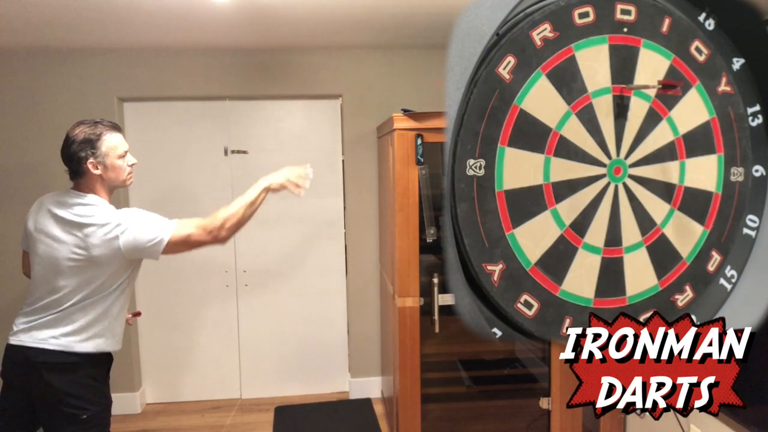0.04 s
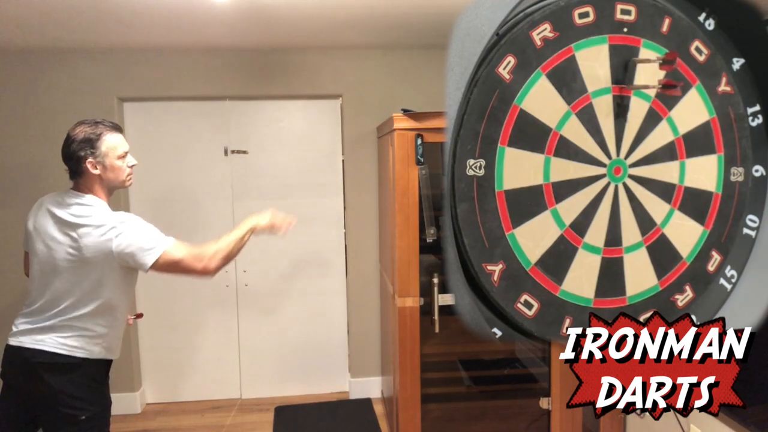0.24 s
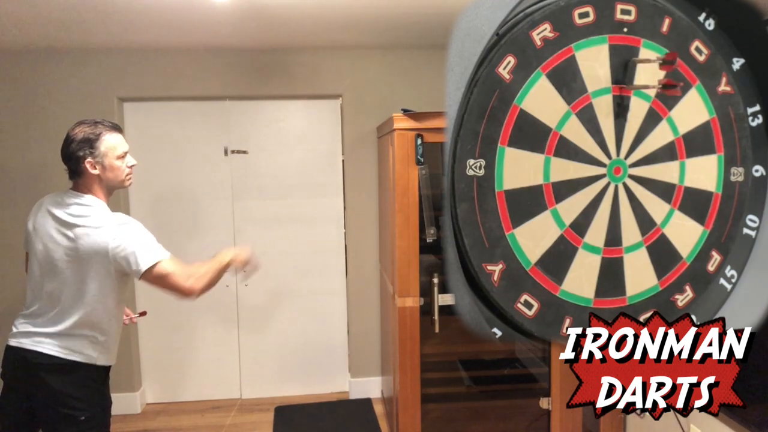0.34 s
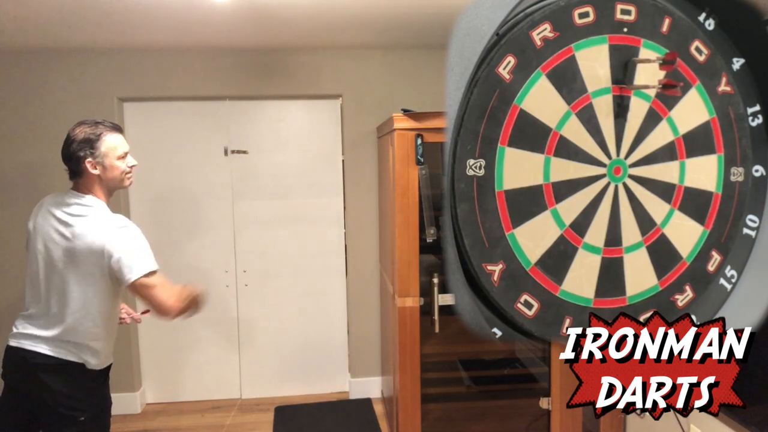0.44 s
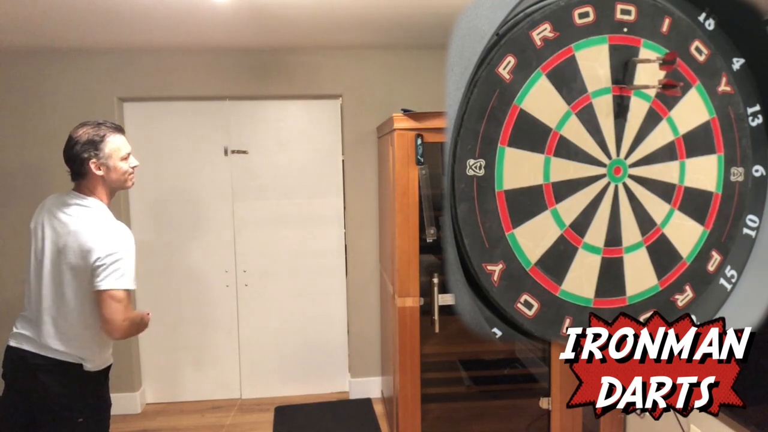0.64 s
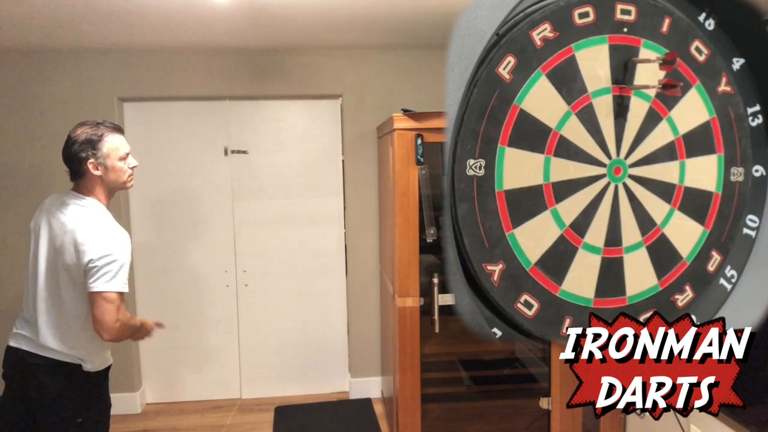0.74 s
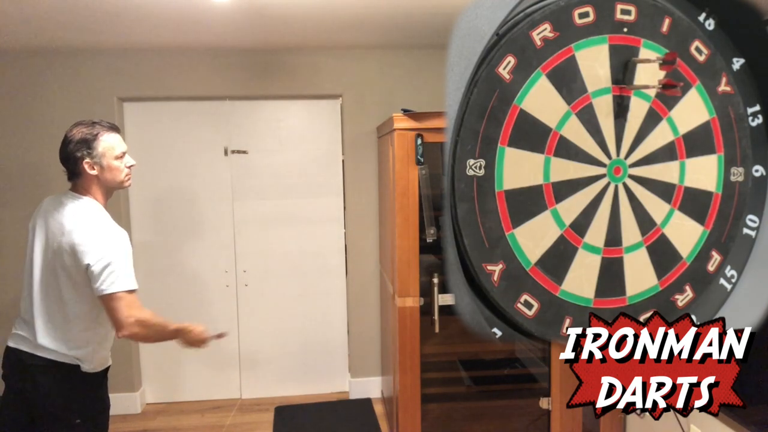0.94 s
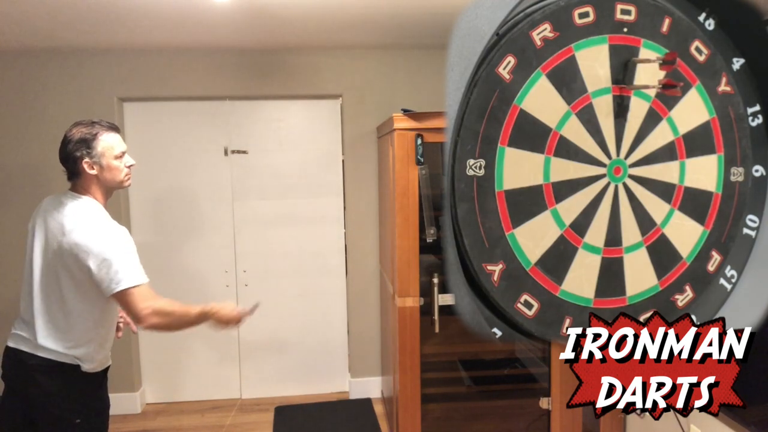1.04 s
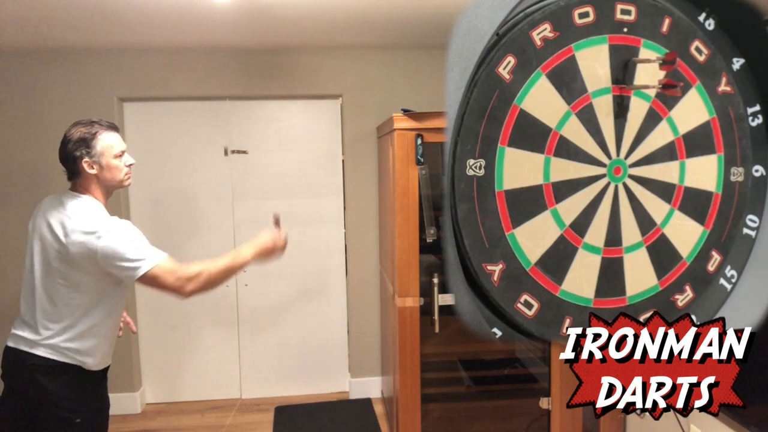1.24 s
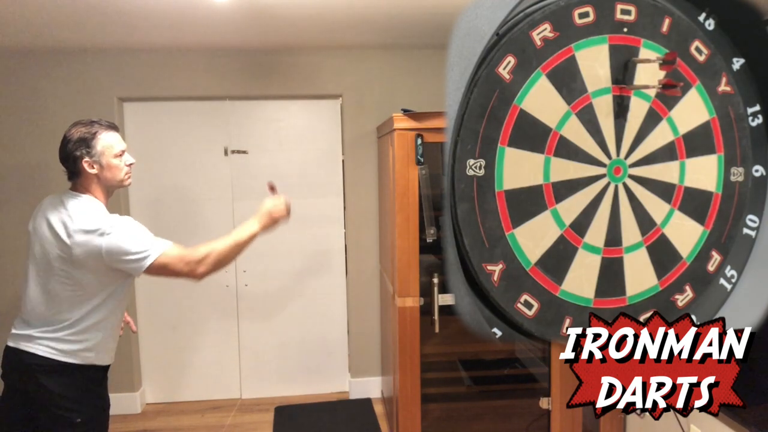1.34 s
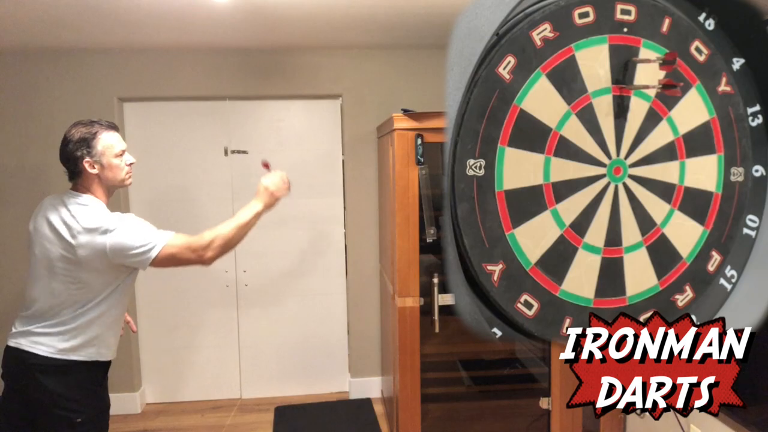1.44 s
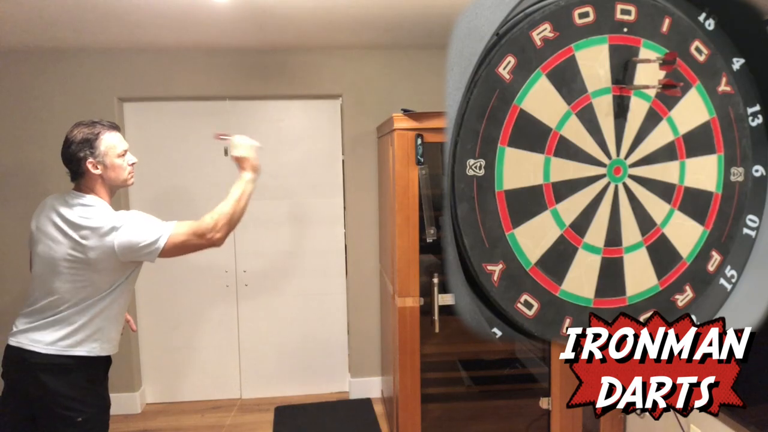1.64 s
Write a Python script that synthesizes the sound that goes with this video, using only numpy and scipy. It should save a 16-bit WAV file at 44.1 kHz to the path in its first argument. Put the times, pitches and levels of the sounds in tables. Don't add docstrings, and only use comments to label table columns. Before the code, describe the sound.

One sharp dart impact on a fibre board, boomy wall ring, then faint clinks and hum

```python
import sys
import numpy as np
from scipy import signal
from scipy.fft import rfft, irfft
from scipy.io import wavfile

SR = 44100
rng = np.random.default_rng(int(sys.argv[2]) if len(sys.argv) > 2 else 0)


def gain_from_decibels(decibels):
    exponent = np.asarray(decibels, float) / 20
    return 10 ** exponent


def int16_out(signal):
    q = np.round(np.clip(np.atleast_2d(signal).T, -1, 1) * 32767)
    wavfile.write(sys.argv[1], SR, q.astype(np.int16))


N = 74970
T = np.arange(N) / SR

HIT_S = 0.2185
LAG_CYCLES = 2.5
# frequency in Hz, t60 in s.
ROOM_DECAY = [(150, 0.8), (700, 0.74), (1500, 0.94), (3500, 0.83), (5500, 0.78), (10300, 0.48),
              (11500, 0.25)]


def rms_one(x):
    return x / np.sqrt(np.mean(x ** 2) + 1e-20)


def at_hz(points, hz):
    table_hz, value = np.transpose(points)
    return np.interp(np.log(hz), np.log(table_hz), value)


def drift(rate):
    r = np.exp(-80 * np.pi * rate / SR)
    slow = signal.lfilter([1], [1, -2 * r, r * r], rng.standard_normal(N // 40 + 2002))[2000:]
    return np.interp(np.arange(N) / 40, np.arange(len(slow)), rms_one(slow))


def blow(start, rise, t60):
    t = np.maximum(T - start, 0)
    swell = (1 - np.exp(-t / max(rise, 1e-4))) ** 2
    return swell * gain_from_decibels(-60 * t / max(t60, 0.005))


def resonant_noise(hz, width):
    r = np.exp(-np.pi * width / SR)
    section = [1, 0, -1, 1, -2 * r * np.cos(2 * np.pi * hz / SR), r * r]
    return rms_one(signal.sosfilt([section] * 2, rng.standard_normal(N + 9000))[9000:])


def coloured(spectrum, db, envelope):
    size = N + 9000
    bins_hz = np.arange(1, size // 2 + 2) * SR / size
    noise = irfft(rfft(rng.standard_normal((2, size))) * gain_from_decibels(at_hz(spectrum, bins_hz)), size)
    level = gain_from_decibels(db) / np.sqrt(np.mean(noise ** 2))
    edges = 26 * 2 ** np.arange(0, 9.4, 1 / 3)
    out = np.zeros(N)
    for k, (lo, hi) in enumerate(zip(edges, edges[1:])):
        band = signal.butter(2, [lo, hi], "band", fs=SR, output="sos")
        out += signal.sosfilt(band, noise[k % 2])[-N:] * envelope(np.sqrt(lo * hi))
    return level * out


def tip():
    # delay after the hit in s, centre in Hz, width in Hz, level in dB, t60 in s.
    crunch = [(0.00054, 8560, 2500, -44.5, 0.095), (0.0043, 3370, 410, -40.5, 0.044),
              (0.005, 4230, 350, -47, 0.044), (.0005, 15400, 2200, -51, 0.046),
              (.0002, 5500, 3700, -56, 0.038)]
    out = np.zeros(N)
    for lag, hz, width, db, t60 in crunch:
        out += gain_from_decibels(db) * resonant_noise(hz, width) * blow(HIT_S + lag, 0.0004, t60)
    return out


def snaps():
    # start in s, level in dB, centre in Hz, width in Hz.
    clicks = [(.2194, -40, 9000, 9000), (.2228, -31, 3500, 1510), (.2234, -31, 11000, 9000),
              (0.2292, -37, 3570, 2000), (0.233, -31, 8000, 6000), (0.2337, -34, 3450, 1200),
              (0.2233, -40, 2150, 300), (.5672, -62, 3500, 300), (.5755, -56, 9000, 8000),
              (.5765, -55, 4200, 4000), (.5853, -57, 8000, 6000), (.5962, -59, 5000, 5000)]
    out = np.zeros(N)
    for start, db, hz, width in clicks:
        t = np.maximum(T - start, 0)
        out += gain_from_decibels(db) * np.sin(2 * np.pi * hz * t) * np.exp(-np.pi * width * t)
    return out


def board():
    # frequency in Hz, level in dB, t60 in s.
    modes = [(226, -28, 0.33), (312, -29, 0.45), (357.7, -25, 0.13), (375, -25.5, 0.37), (473, -31, 0.18),
             (517.6, -31, 0.52), (560, -38, 0.76), (595, -22, 0.21), (603.9, -28, 0.34), (642, -39, 0.4),
             (645, -27.5, 0.2), (790, -36.5, 0.37), (911, -28, 0.11), (951, -36, 0.22)]
    out = np.zeros(N)
    for hz, db, t60 in modes:
        tone = np.sin(2 * np.pi * hz * T + rng.uniform(0, 2 * np.pi))
        start = HIT_S + 0.002 + LAG_CYCLES / hz
        out += gain_from_decibels(db) * tone * blow(start, 2 / hz, t60)
    return out


def wall():
    # delay after the hit in s, frequency in Hz, level in dB, rise in s, t60 in s.
    late_modes = [(0.0071, 143, -13.5, 0.0023, 0.08), (0.0323, 85.4, -11, 0.0053, 0.14),
                  (0.0393, 55, -28.5, 0.029, 0.55), (0.056, 125, -22.5, 0.0044, 0.12),
                  (0.099, 150, -16.5, 0.0095, 0.099), (0.13, 88, -23, 0.016, 0.23),
                  (.14, 670, -32, 0.012, 0.19), (0.1, 420, -41, 0.011, 0.14),
                  (0.065, 760, -34, 0.0042, 0.072), (.035, 695, -20, 0.0091, 0.13),
                  (.04, 975, -31.5, 0.0062, 0.092), (.085, 915, -31, 0.013, 0.21),
                  (.145, 535, -27, .012, 0.12), (.012, 460, -28.5, 0.0038, 0.18),
                  (.02, 740, -30, 0.0095, 0.15), (.11, 205, -31.5, 0.0093, 0.122),
                  (.188, 740, -29, 0.0045, 0.082), (.1, 780, -34.5, .01, 0.24),
                  (0.00296, 895, -34, 0.0027, 0.11), (0.00601, 680, -24, .004, .08),
                  (0.164, 610, -31, 0.011, 0.086), (.085, 590, -30, .008, 0.11),
                  (.021, 495, -19, 0.0036, .09), (.028, 850, -31.5, .006, 0.13),
                  (0.121, 890, -34.5, .01, 0.13), (.155, 720, -29, 0.0093, 0.1)]
    out = np.zeros(N)
    for lag, hz, db, rise, t60 in late_modes:
        start = HIT_S + lag
        out += gain_from_decibels(db) * np.sin(2 * np.pi * hz * (T - start)) * blow(start, rise, t60)
    return out


def room_tail():
    # frequency in Hz, level in dB per Hz.
    thud = [(40, -40), (90, -28), (250, -22.5), (600, -16.5), (980, -26), (1150, -35), (2200, -48),
            (3000, -57)]
    # frequency in Hz, level in dB per Hz.
    splash = [(1500, -7), (2700, -4.5), (3450, 1), (4500, -7), (6500, -17.5), (7800, -7.5), (10100, -9),
              (10900, -24)]

    def dull_decay(hz):
        return blow(HIT_S + LAG_CYCLES / hz, 0.0044, at_hz(ROOM_DECAY, hz))

    def bright_decay(hz):
        return blow(HIT_S, 0.0019, at_hz(ROOM_DECAY, hz))

    return coloured(thud, -26.5, dull_decay) + coloured(splash, -48, bright_decay)


def thin_whistle():
    # start in s, end in s, centre in Hz, width in Hz, level in dB.
    whistle = (0, 1.18, 993, 28, -69)
    start, end, hz, width, db = whistle
    gate = np.clip(np.minimum(T - start, end - T) / 0.01, 0, 1)
    return gain_from_decibels(db) * gate * resonant_noise(hz, width)


def clinks():
    # start in s, level in dB.
    touches = [
        (.567, -72),
        (0.574, -66.5),
        (0.584, -74),
        (.8454, -83),
    ]
    # frequency in Hz, level in dB per Hz.
    clink_colour = [(1500, -28), (2900, -8), (3500, -1), (4300, -8), (5800, -10.5), (7600, -8.5),
                    (10500, -12.5), (15500, -19)]
    rise_s = 0.00074

    def wash_envelope(hz):
        t60 = 0.95 * at_hz(ROOM_DECAY, hz)
        return sum(gain_from_decibels(db) * blow(start, rise_s, t60) for start, db in touches)

    wash = coloured(clink_colour, 0, wash_envelope)
    ring = sum(gain_from_decibels(db - 8) * blow(start, rise_s, 0.88) for start, db in touches)
    return wash + ring * resonant_noise(3550, 420)


def steps():
    # start in s, level in dB, pitch in Hz, t60 in s.
    shifts = [
        (0.469, -24.5, 83.6, 0.2),
        (1.563, -56.5, 441.6, 0.45),
    ]
    out = np.zeros(N)
    for start, db, hz, t60 in shifts:
        out += gain_from_decibels(db) * np.sin(2 * np.pi * hz * (T - start)) * blow(start, 0.0053, t60)
    return out


def sleeve():
    # time in s, level in dB.
    rustle = [(0, -71.5), (.2, -77), (1.2, -77.5), (1.55, -73), (1.7, -73)]
    band = signal.butter(2, [490, 4760], "band", fs=SR, output="sos")
    cloth = rms_one(signal.sosfilt(band, rng.standard_normal(N)))
    return gain_from_decibels(np.interp(T, *np.transpose(rustle)) + drift(15)) * cloth


def hum():
    # frequency in Hz, level in dB rms, unsteadiness in dB.
    motor = [(120.2, -47, 2), (240.8, -53, 2), (289.8, -49.5, 2.0), (484, -69, 1.9), (563, -75.5, -4.5)]
    # centre in Hz, width in Hz, level in dB.
    duct = [(87.74, 10.4, -45), (55.8, 9.3, -54.5), (184, 80, -61.5)]
    # frequency in Hz, level in dB per Hz.
    air = [(30, -19), (85, 0), (130, 2), (280, -6), (320, -9), (1050, -24.5), (1450, -34.5), (3500, -56)]
    out = coloured(air, -46.5, lambda hz: gain_from_decibels(1.4 * drift(2.8)))
    for hz, db, wobble_db in motor:
        tone = np.sqrt(2) * np.sin(2 * np.pi * hz * T + rng.uniform(0, 2 * np.pi))
        out += gain_from_decibels(db + wobble_db * drift(2.76)) * tone
    for hz, width, db in duct:
        out += gain_from_decibels(db) * resonant_noise(hz, width)
    return out


def hiss():
    # frequency in Hz, level in dB per Hz.
    hiss_colour = [(1000, -6), (2500, 0), (4000, -1), (6500, -5), (9000, -12), (12000, -15), (15000, -16),
                   (15800, -22)]
    return coloured(hiss_colour, -77, lambda hz: 1)


def scene():
    impact = tip() + snaps() + board() + wall() + room_tail()
    thrower = thin_whistle() + clinks() + steps() + sleeve()
    return (impact + thrower + hum() + hiss())[None]


def roll_off(x):
    return signal.sosfilt(signal.butter(12, 16420, fs=SR, output="sos"), x)


def record(dry):
    faded = dry * np.minimum(T / 0.004, 1)
    top_cut = signal.cheby2(16, 60, 16100, fs=SR, output="sos")
    low_cut = signal.butter(4, 45, "high", fs=SR, output="sos")
    return roll_off(signal.sosfilt(low_cut, signal.sosfilt(top_cut, faded)))


dry = scene()
out = record(dry)
int16_out(out)
```